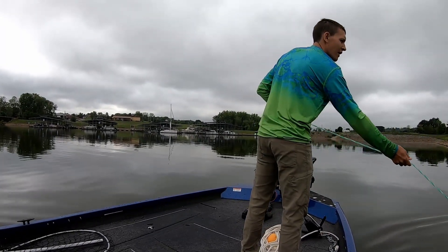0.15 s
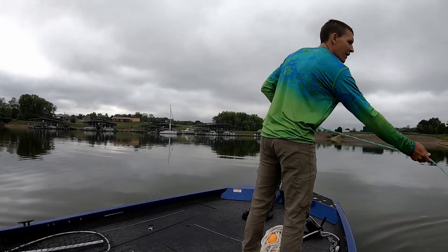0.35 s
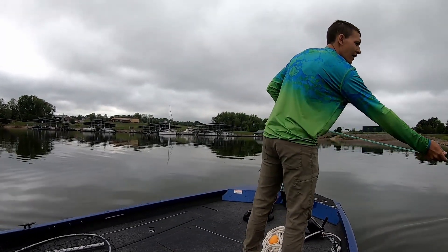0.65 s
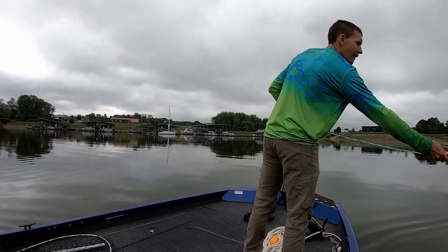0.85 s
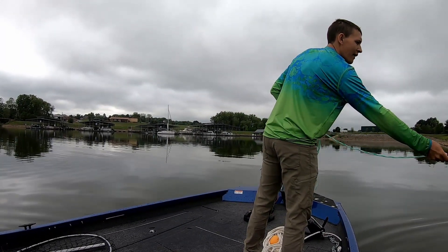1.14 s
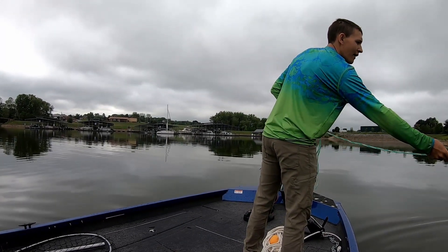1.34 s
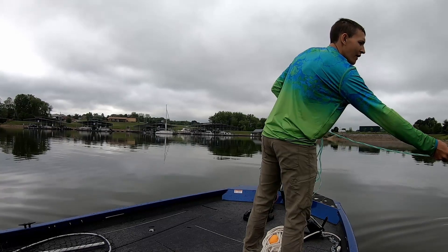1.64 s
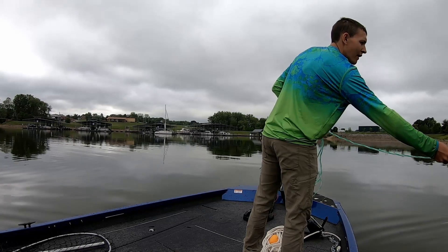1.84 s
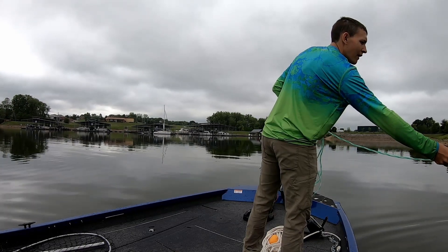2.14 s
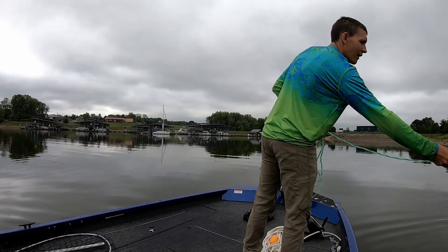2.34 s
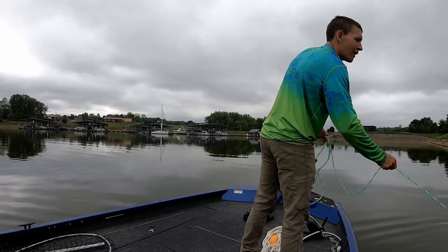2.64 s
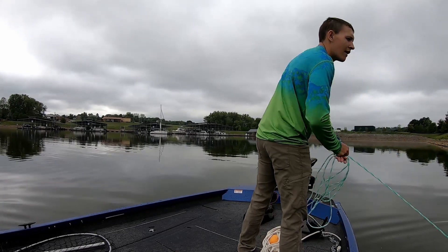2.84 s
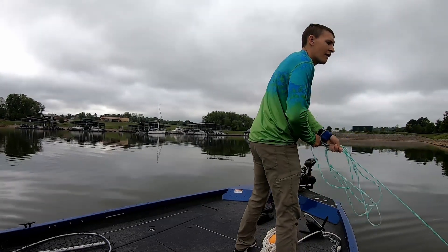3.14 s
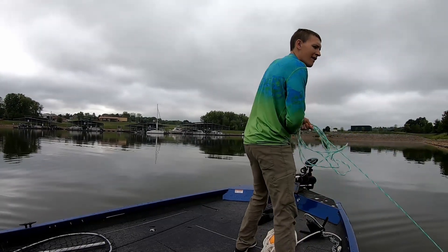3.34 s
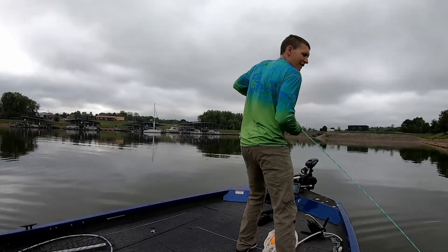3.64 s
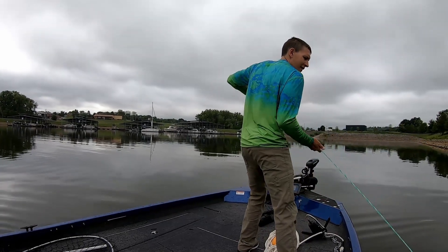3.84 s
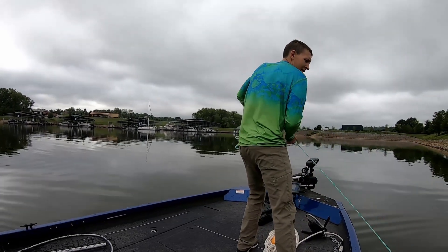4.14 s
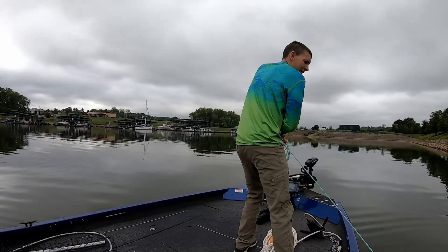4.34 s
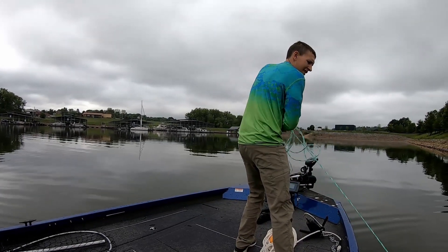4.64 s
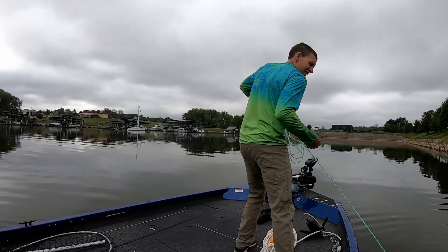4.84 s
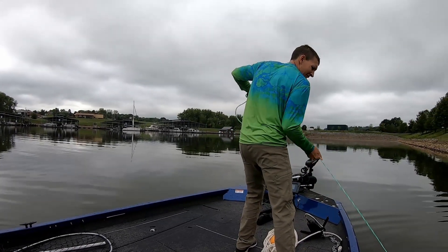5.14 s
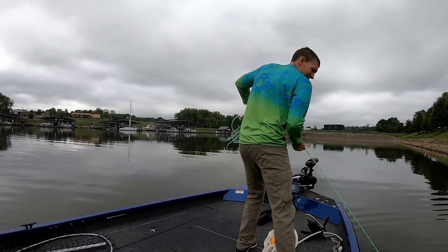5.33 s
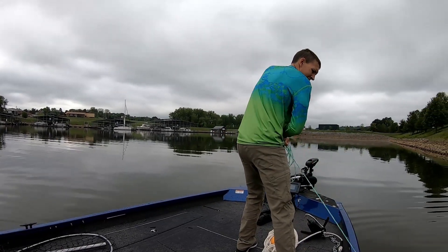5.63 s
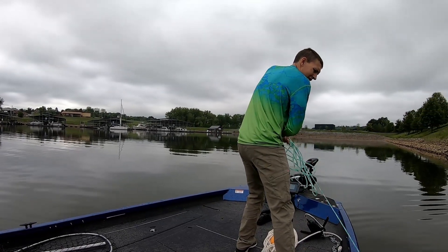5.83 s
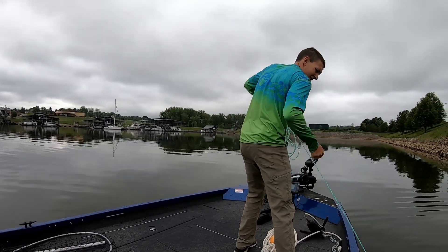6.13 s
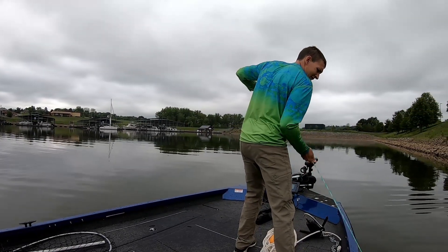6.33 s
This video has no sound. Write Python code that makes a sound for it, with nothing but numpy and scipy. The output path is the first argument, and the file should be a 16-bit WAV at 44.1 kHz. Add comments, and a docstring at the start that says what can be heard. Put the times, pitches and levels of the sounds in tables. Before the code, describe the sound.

A wet rope splashes briefly on calm water and ticks as it is hauled in, over distant engine rumble and soft wind puffs.

```python
"""Hauling a cast net on a calm lake

The wet line slaps the water beside a boat in a short double splash: trapped bubbles resonate and spray
patters down. Drops fall and the rope rustles and ticks by friction as it is hauled in hand over hand.
Far engines and traffic rumble, a distant bird whistles, and slow puffs of air press on the microphone."""
import sys
import numpy as np
from scipy import signal
from scipy.fft import rfft, irfft, next_fast_len
from scipy.io import wavfile
from scipy.ndimage import map_coordinates

SR = 44100
rng = np.random.default_rng(int(sys.argv[2]) if len(sys.argv) > 2 else 0)


def inscribe(sig):
    """Save sig as 16-bit PCM at rate SR to the path in sys.argv[1].

    A 1-D sig is mono; a 2-D sig holds one channel per row.
    Samples are clipped to [-1, 1] before scaling.
    """
    pcm = np.round(np.clip(np.atleast_2d(sig).T, -1, 1) * 32767)
    wavfile.write(sys.argv[1], SR, pcm.astype(np.int16))


N = 285756

# running of the far engine: (time [s], shaft rate [Hz], gain [dB])
ENGINE_RUN = [(0, 28.81, 2), (1.5, 29.22, 0.5), (3.6, 29.14, -1), (5, 28.66, 0), (6.48, 28.62, 1)]
# its harmonics: (multiple of the shaft rate [1], level [dB])
SHAFT_HARMONICS = [(2, -42), (3, -48), (4, -56.5), (5, -53)]
# fading of a second motor: (time [s], level [dB])
MOTOR_FADE = [(0, -49.5), (.76, -48), (1.0, -61), (1.6, -66), (6.48, -103)]
# its partials: (frequency [Hz], relative level [dB])
MOTOR_PARTIALS = [(71, -3), (132, -1), (142, -3.5), (166, -10.5), (187, -1.5), (214.5, 0.5), (426, -10)]
# traffic on the shore: (time [s], rumble level [dB], wash level [dB])
TRAFFIC_LEVELS = [(0, -39, -47.5), (.75, -40.5, -49), (1.0, -42.5, -49), (2.2, -40.5, -48),
                  (3.0, -41, -48.5), (4.2, -40.5, -49), (5.0, -40.5, -48), (6.48, -40.5, -48)]
# spectra of its deep rumble and broad wash: (frequency [Hz], relative density [dB])
RUMBLE_SPECTRUM = [(15, -13), (30, 1.5), (45, 1.5), (65, 1.5), (100, -1.5), (140, -4), (190, -8.5),
                   (260, -15), (400, -35.5), (800, -57.5)]
WASH_SPECTRUM = [(120, -7), (300, 2.5), (430, 1), (550, -2.5), (800, -3.5), (1200, -8), (1700, -11),
                 (2500, -15.5), (4400, -21.5), (5300, -24.5), (9000, -27.5), (15500, -31)]
# puffs of air on the microphone: (centre time [s], duration [s], level [dB])
AIR_PUFFS = [(1.68, 0.42, -23.5), (2.22, 0.24, -23), (2.67, .2, -15.5), (3.37, 0.16, -28.5),
             (3.81, 0.24, -21), (4.13, 0.22, -24), (4.41, .12, -24.5), (5.43, 0.12, -23.5),
             (5.8, 0.49, -26.5)]
# flicks of the rope through the hands: (time [s], level [dB], centre frequency [Hz])
ROPE_FLICKS = [(.453, -54, 3200), (.586, -53, 7000), (3.255, -51, 7000), (4.127, -53, 5000),
               (4.376, -42.5, 2400), (4.384, -49, 3300), (4.413, -50, 2000), (4.429, -41, 2200),
               (5.348, -51, 3400), (5.825, -55, 6500), (5.882, -53, 4000)]
# pulls of the wet line through the fingers: (centre time [s], duration [s], level [dB])
ROPE_PULLS = [(3.05, .17, -67), (3.35, .26, -68), (3.65, .15, -70.5), (4.11, .22, -66.5),
              (4.39, .14, -71.5), (4.79, .14, -67.5), (5.83, .16, -67.5)]
# spectrum of the rubbing fibres: (frequency [Hz], relative density [dB])
FIBRE_SPECTRUM = [(1200, -28), (3000, 0), (5000, -8), (9000, -9), (12000, -12), (16000, -20)]
# double snap as the rope is gathered: (time [s], frequency [Hz], level [dB], 60 dB decay time [s])
ROPE_SNAP = [(4.601, 2300, -29.5, 0.0025), (4.6051, 8460, -22.5, .0022), (4.606, 4310, -34.5, 0.0051)]
# the loudest air pockets and drops on the water: (time [s], frequency [Hz], level [dB])
TRAPPED_BUBBLES = [(.455, 2690, -42), (2.742, 1226, -25.5), (2.7500, 2800, -28.5), (2.7508, 7700, -32.5),
                   (2.7526, 1210, -29.5), (2.7545, 1816, -31), (2.757, 2200, -25.5), (2.7583, 1360, -26.5),
                   (2.7593, 4000, -25.5), (2.7742, 1480, -31.5), (2.7750, 4470, -26), (2.7770, 7440, -31.5),
                   (2.7775, 2330, -26.5), (2.7794, 3300, -31.5), (2.7826, 4400, -31), (2.7882, 4000, -29),
                   (2.7984, 4300, -35), (2.804, 3900, -27), (2.8046, 8000, -29), (2.813, 4650, -33),
                   (2.8134, 8540, -34), (2.864, 2230, -36), (2.872, 3600, -37), (2.8764, 2780, -28),
                   (2.8843, 2890, -41), (2.8894, 4020, -29.5), (2.9024, 7340, -38), (2.915, 6900, -36.5),
                   (2.9166, 10000, -38), (2.932, 8900, -40), (3.007, 4400, -42), (3.017, 9250, -44),
                   (3.425, 9400, -38), (3.453, 5500, -44), (3.621, 5150, -47), (4.045, 6900, -44),
                   (4.127, 4550, -43), (4.762, 8200, -47), (4.803, 9400, -45), (5.543, 11100, -40)]
# bird notes: (time [s], duration [s], start frequency [Hz], end frequency [Hz], level [dB])
BIRD_NOTES = [(0.656, 0.12, 4520, 4840, -67), (.755, .13, 4820, 4880, -72.5), (.88, .055, 4780, 4310, -64),
              (1.027, 0.14, 4720, 4370, -64.5), (1.232, 0.072, 4130, 4230, -67),
              (2.63, 0.087, 3810, 3880, -65), (4.037, .1, 2700, 2830, -64), (5.28, .08, 4160, 4240, -70),
              (5.57, .1, 2850, 2660, -68), (6.07, .06, 4360, 4440, -68)]
# spray thrown up as the line slaps the water: (time [s], level [dB], hold time [s])
LINE_SLAPS = [(2.739, -47, 0.055), (2.873, -52.5, .012)]
# spectrum of the falling spray: (frequency [Hz], relative density [dB])
SPRAY_SPECTRUM = [(700, -22), (1300, -1), (2400, 6), (4300, 3.5), (6000, -7), (9000, -6), (12000, -17),
                  (16000, -25)]

BUBBLE_CYCLES = 35.2  # periods in a 60 dB decay, so large, low bubbles ring longer


def amp(db):
    """Amplitude grows tenfold for every 20 dB."""
    return 10 ** (np.asarray(db) / 20)


def unit(x):
    """Normalisation to an rms of 1."""
    return x / np.sqrt(np.mean(x ** 2) + 1e-20)


def curves(rows):
    """Linear interpolation in time gives each later column one value per sample."""
    times, *columns = np.transpose(rows)
    return [np.interp(np.arange(N) / SR, times, column) for column in columns]


def wobble(rate):
    """Slow random modulation: a spline through `rate` random values a second."""
    knots = rng.standard_normal(int(N * rate / SR) + 4)
    return map_coordinates(knots, [np.arange(N) * rate / SR])


def swells(rows):
    """Gaussian envelopes, one per row, sum to a gain curve."""
    t = np.arange(N) / SR
    return sum(amp(db) * np.exp(-(2 * (t - s) / length) ** 2) for s, length, db in rows)


def filtered(x, response):
    """Linear filtering multiplies the spectrum by a frequency response."""
    size = next_fast_len(len(x) + SR // 2)
    return irfft(rfft(x, size) * response(np.fft.rfftfreq(size, 1 / SR)), size)[:len(x)]


def coloured(x, spectrum):
    """Spectral shaping by (frequency [Hz], level [dB]) points, at rms 1."""
    f, db = np.transpose(spectrum)
    return unit(filtered(x, lambda hz: amp(np.interp(np.log(hz + 1), np.log(f), db))))


def band(x, centre_hz, width_hz):
    """Response of a damped resonator driven by x, at rms 1."""
    return unit(filtered(x, lambda f: 1j * f * width_hz / (centre_hz ** 2 - f * f + 1j * f * width_hz)))


def noise():
    """White noise has equal mean power at all frequencies."""
    return rng.standard_normal(N)


def add(track, s, sound):
    """Superposition: a sound adds to the track from time s."""
    part = track[round(s * SR):][:len(sound)]
    part += sound[:len(part)]


def far_tone(hz, rate, depth):
    """Propagation over water modulates a tone's amplitude and phase; the result has rms 1."""
    phase = 2 * np.pi * (np.cumsum(hz * np.ones(N)) / SR + rng.random())
    in_phase = (1 + depth * wobble(rate)) * np.sin(phase)
    quadrature = depth * wobble(rate) * np.cos(phase)
    return unit(in_phase + quadrature)


def engines(hum_hz=241.6):
    """Periodic motion radiates harmonics of the shaft rate, beside a hum and a fading second motor."""
    shaft_hz, gain_db = curves(ENGINE_RUN)
    throb = sum(amp(db) * far_tone(k * shaft_hz, rate=9, depth=0.26) for k, db in SHAFT_HARMONICS)
    hum = amp(-57) * far_tone(hum_hz, rate=4.2, depth=0.25)
    drone = sum(amp(db) * far_tone(hz, rate=4.82, depth=0.22) for hz, db in MOTOR_PARTIALS)
    return amp(gain_db) * throb + hum + amp(curves(MOTOR_FADE)[0]) * drone


def traffic(nearest_s=4.07, half_power_s=0.87, car_db=-53.5):
    """Over broadband traffic noise, one car's tyre sound spreads spherically, falling as 1 / distance."""
    rumble_db, wash_db = curves(TRAFFIC_LEVELS)
    rumble = amp(rumble_db) * coloured(noise(), RUMBLE_SPECTRUM)
    wash = amp(wash_db + 0.35 * wobble(6.9)) * coloured(noise(), WASH_SPECTRUM)
    distance = np.hypot(1, (np.arange(N) / SR - nearest_s) / half_power_s)  # 1 at closest approach
    tyres = amp(car_db + wobble(5)) / distance * band(band(noise(), 804, 230), 804, 230)
    return rumble + wash + tyres


def breeze(calm_db=-37.5):
    """Puffs of air load the microphone diaphragm with infrasonic pressure and a faint flutter above it."""
    swing = signal.hilbert(band(band(noise(), 6.5, 4.4), 6.62, 4.5))
    even_swing = np.sqrt(2) * np.cos(np.angle(swing))  # phase alone, so the amplitude is constant
    pressure = filtered(even_swing, lambda hz: 1 / (1 + (hz / 17) ** 6))
    flutter = coloured(noise(), [(8, -40), (18, 7), (30, -14), (50, -12),
                                 (100, -25), (300, -48), (1000, -100)])
    return (amp(calm_db) + swells(AIR_PUFFS)) * (pressure + amp(-15) * flutter)


def far_chirps(count=60, low_hz=2400, high_hz=4800, floor_db=-77, length_s=0.058, glide=0.102):
    """Birds across the water chirp at random: faint, short linear frequency sweeps."""
    out, t = np.zeros(N), np.arange(round(length_s * SR)) / SR
    for when, pitch, slope, size in rng.random((count, 4)):
        start_hz = low_hz + pitch * (high_hz - low_hz)
        hz = start_hz * (1 + glide * (2 * slope - 1) * t / length_s)
        chirp = np.hanning(len(t)) * np.sin(2 * np.pi * np.cumsum(hz) / SR)
        add(out, when * N / SR, amp(floor_db + 10 * size) * chirp)
    return out


def patter(per_s, spectrum):
    """Shot noise: tiny independent impacts of random size, at rms 1."""
    chance, size = rng.random(N), noise()
    return coloured(size * (chance < per_s / SR), spectrum)


def ringing_impact(hz, t60, rise=0.069, swell_cycles=0.5, click_db=1, click_cycles=0.45):
    """An impact clicks and excites a damped oscillation whose frequency climbs a little."""
    t = np.arange(SR // 16) / SR
    cycles = np.cumsum(hz * (1 + rise * np.minimum(t / t60, 1))) / SR
    envelope = amp(-60 * t / t60) * (1 - np.exp(-cycles / swell_cycles))
    click_hz = min(1.26 * hz, 8500)  # larger air pockets come from softer slaps
    age = click_hz * t / click_cycles
    click = amp(click_db) * age * np.exp(-age) * np.sin(2 * np.pi * click_hz * t)
    return envelope * np.sin(2 * np.pi * cycles) + click


def small_drops(flow, count, low_hz, high_hz, level_db, spread_db):
    """Drops excite bubble resonances of random pitch and size, at a rate proportional to the flow."""
    out, share = np.zeros(N), np.cumsum(flow) / np.sum(flow)
    for k, (when, pitch, size) in enumerate(rng.random((count, 3))):
        s = np.searchsorted(share, (k + when) / count) / SR
        hz = low_hz * (high_hz / low_hz) ** pitch
        add(out, s, amp(level_db - spread_db * size) * ringing_impact(hz, BUBBLE_CYCLES / hz))
    return out


def rope(scuff_t60=0.017, band_ratio=1.3):
    """Friction in the hands makes the wet line rustle and scuff; it sheds drops and gives a double snap."""
    pull, t = swells(ROPE_PULLS), np.arange(SR // 16) / SR
    out = pull * patter(350, FIBRE_SPECTRUM)
    out += small_drops(pull, count=30, low_hz=6530, high_hz=11000, level_db=-50.5, spread_db=3)
    for s, db, hz in ROPE_FLICKS:
        spectrum = [(hz / 4, -25), (hz / band_ratio, 0), (hz * band_ratio, 0), (hz * 4, -20)]
        scuff = coloured(rng.standard_normal(len(t)), spectrum)
        add(out, s, amp(db - 60 * t / scuff_t60) * scuff)
    for s, hz, db, t60 in ROPE_SNAP:
        add(out, s, amp(db) * ringing_impact(hz, t60))
    return out


def bubbles():
    """Bubble resonance: air trapped by an impact acts as a spring against the mass of the water."""
    out = np.zeros(N)
    for s, hz, db in TRAPPED_BUBBLES:
        add(out, s, amp(db) * ringing_impact(hz, BUBBLE_CYCLES / hz))
    return out


def bird(quaver=0.00513, arch=0.009, fade_s=0.016):
    """Frequency modulation of a pure tone makes each whistle an arched, quavering glide."""
    out, t = np.zeros(N), np.arange(N) / SR
    waver = 1 + quaver * wobble(200)
    for s, length, start_hz, end_hz, db in BIRD_NOTES:
        progress = np.clip((t - s) / length, 0, 1)
        hz = (start_hz + (end_hz - start_hz) * progress) * (1 + arch * np.sin(np.pi * progress))
        gate = np.minimum(np.minimum(progress, 1 - progress) * length / fade_s, 1)
        out += gate * amp(db) * np.sqrt(2) * np.sin(2 * np.pi * np.cumsum(hz * waver) / SR)
    return out


def spray(attack_s=0.005, release_s=0.011):
    """Droplet impacts around each slap merge into shot noise, among a few small ringing bubbles."""
    flow, t = np.zeros(N), np.arange(N) / SR
    for s, db, hold in LINE_SLAPS:
        before, after = np.maximum(s - t, 0), np.maximum(t - s - hold, 0)
        flow += amp(db) * np.exp(-before / attack_s - after / release_s)
    hiss = flow * patter(5000, SPRAY_SPECTRUM)
    return hiss + small_drops(flow, count=12, low_hz=1920, high_hz=5000, level_db=-40.5, spread_db=6)


def echoed(x, t60, wet_db):
    """Reverberation: diffuse reflections add an exponentially decaying tail."""
    t = np.arange(SR // 2) / SR
    tail = rng.standard_normal(len(t)) * amp(-60 * t / t60)
    return x + amp(wet_db) * signal.fftconvolve(x, tail / np.linalg.norm(tail))[:N]


def scene():
    """The sources superpose; near sounds scatter off the hull and birdsong reflects along the bank."""
    near = echoed(bubbles() + spray() + rope(), t60=0.043, wet_db=-10.5)
    birds = echoed(bird() + far_chirps(), t60=0.4, wet_db=-5)
    return (near + birds + engines() + traffic() + breeze())[None]


def record(dry):
    """Band limiting: an ideal low-pass filter removes everything above 15.8 kHz."""
    return filtered(dry[0], lambda hz: hz < 15800)[None]


dry = scene()
out = record(dry)
inscribe(out)
```